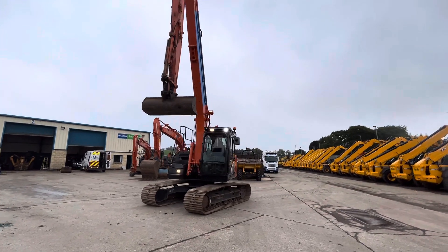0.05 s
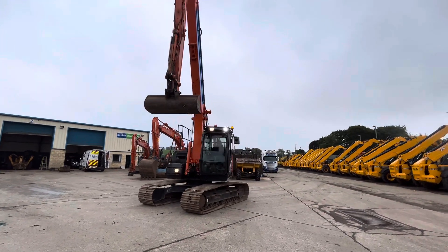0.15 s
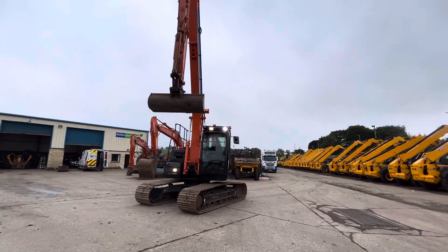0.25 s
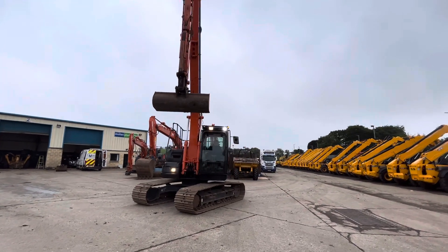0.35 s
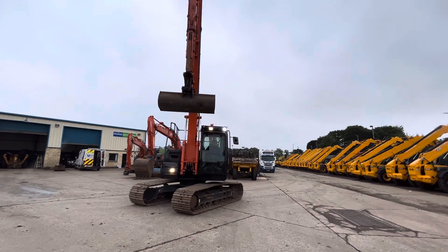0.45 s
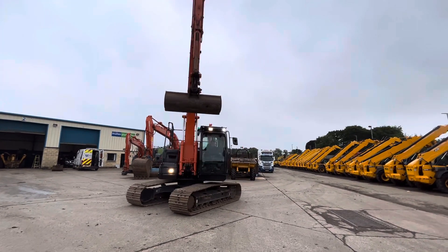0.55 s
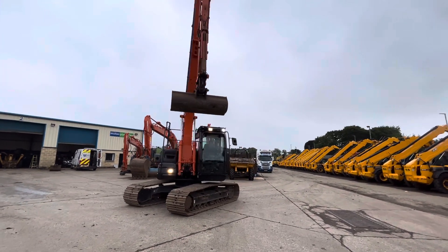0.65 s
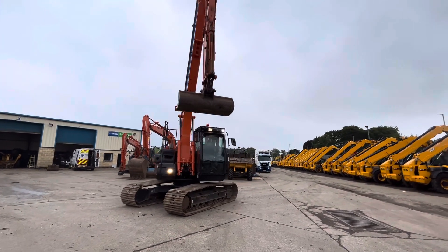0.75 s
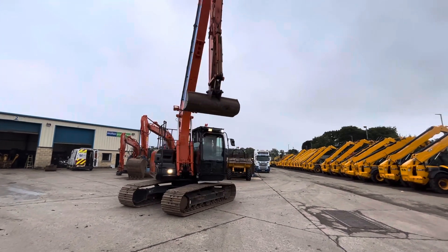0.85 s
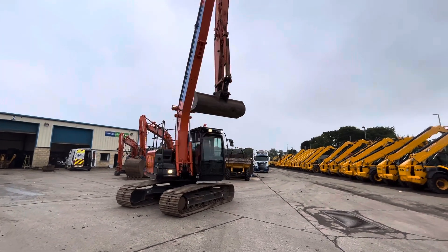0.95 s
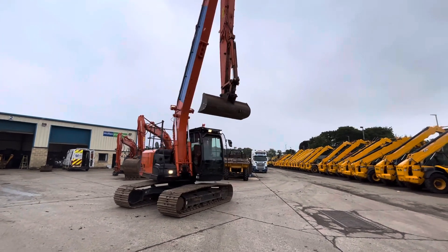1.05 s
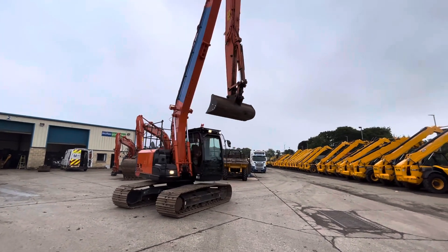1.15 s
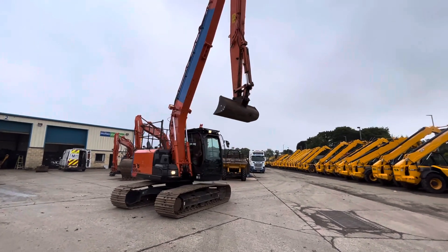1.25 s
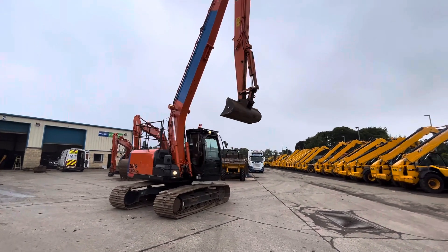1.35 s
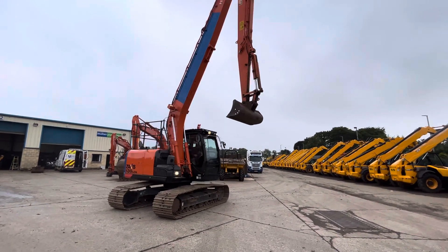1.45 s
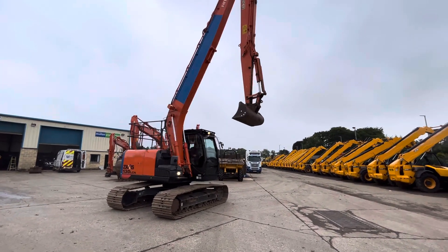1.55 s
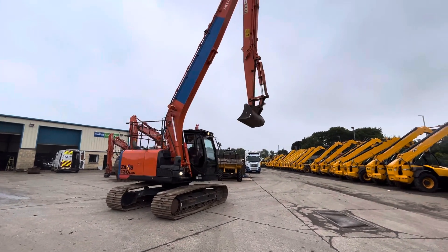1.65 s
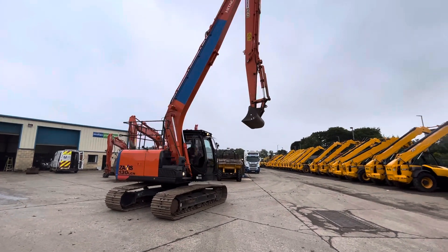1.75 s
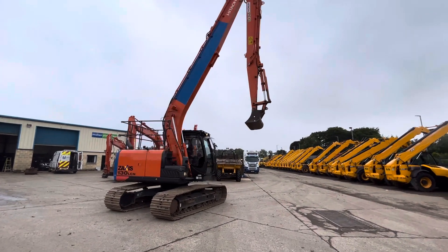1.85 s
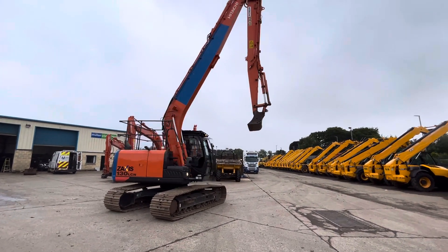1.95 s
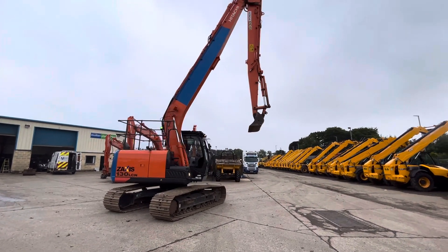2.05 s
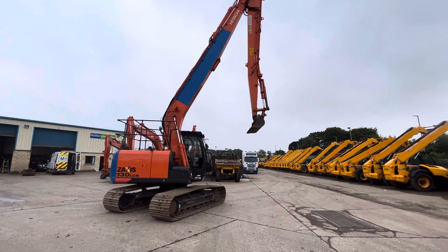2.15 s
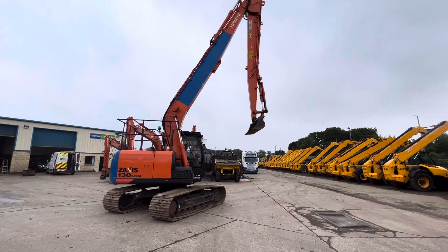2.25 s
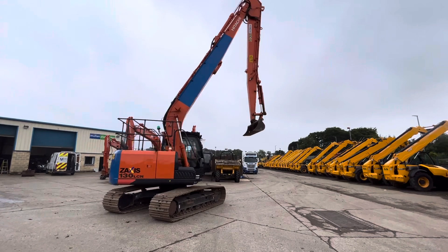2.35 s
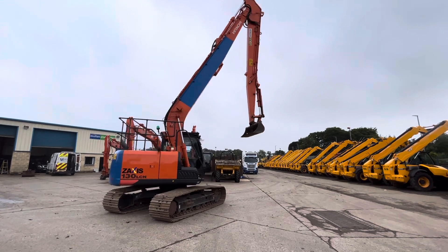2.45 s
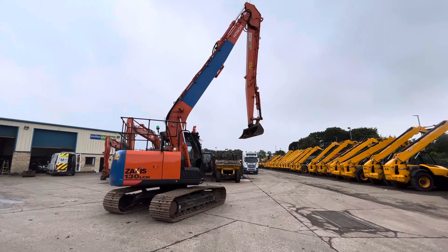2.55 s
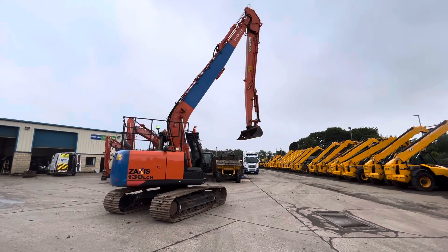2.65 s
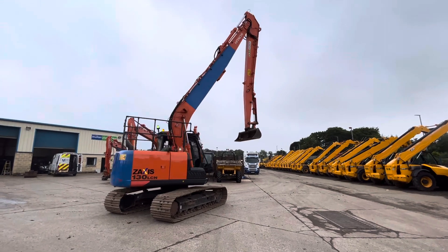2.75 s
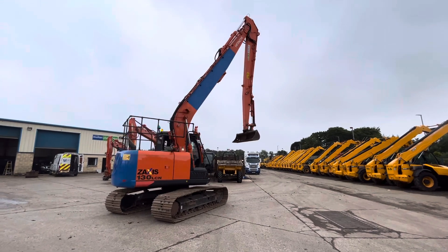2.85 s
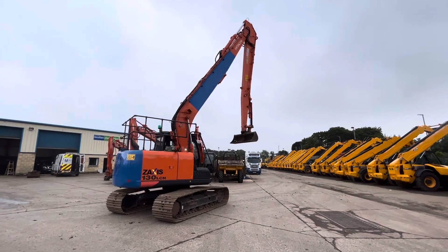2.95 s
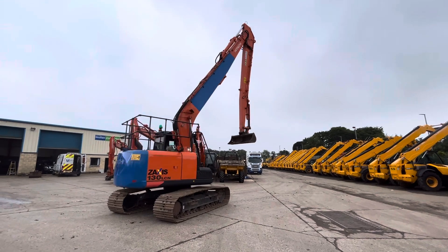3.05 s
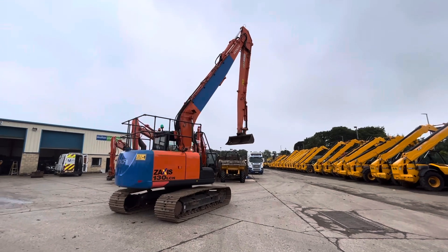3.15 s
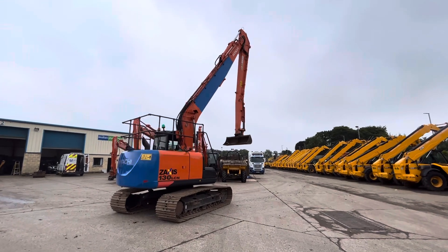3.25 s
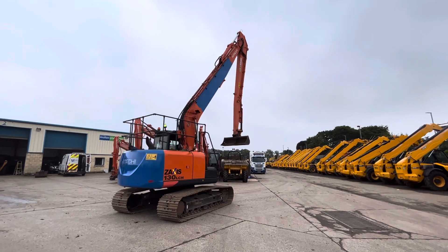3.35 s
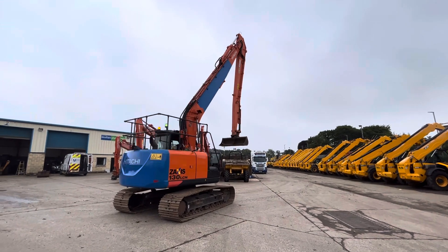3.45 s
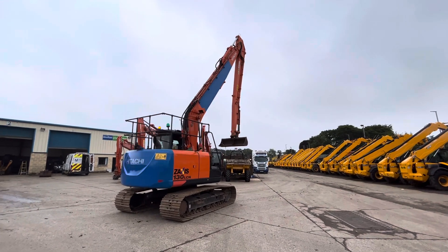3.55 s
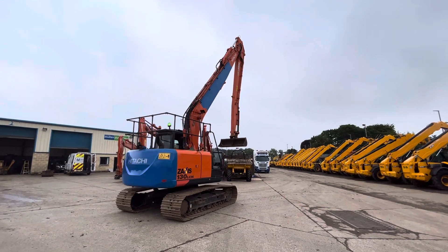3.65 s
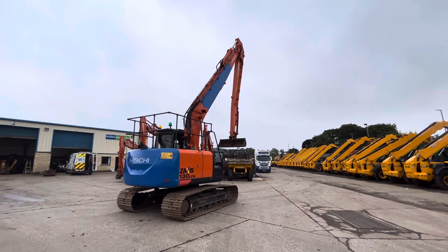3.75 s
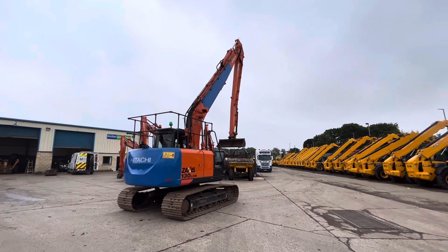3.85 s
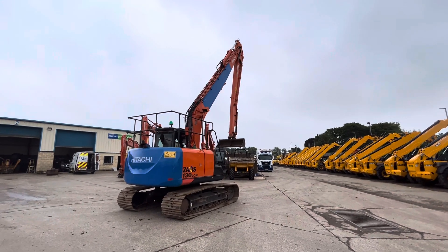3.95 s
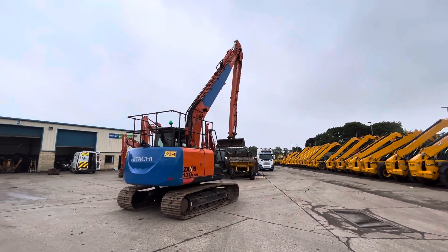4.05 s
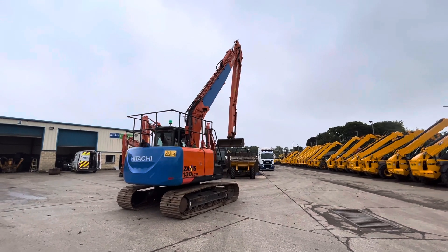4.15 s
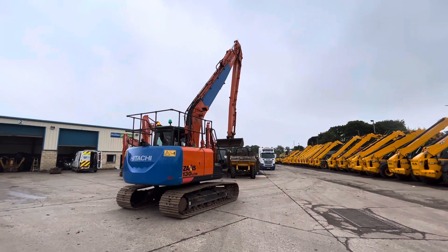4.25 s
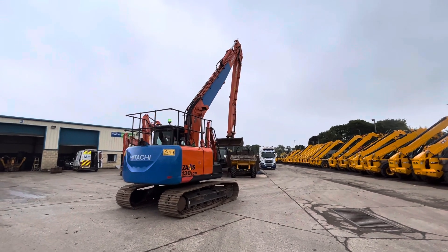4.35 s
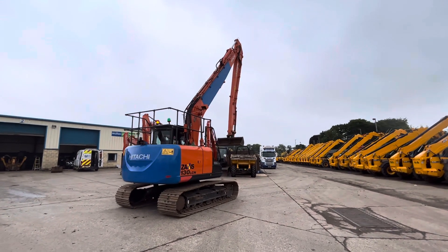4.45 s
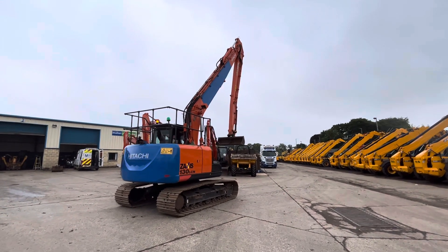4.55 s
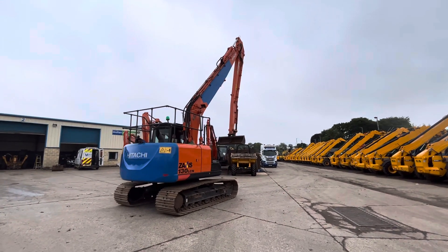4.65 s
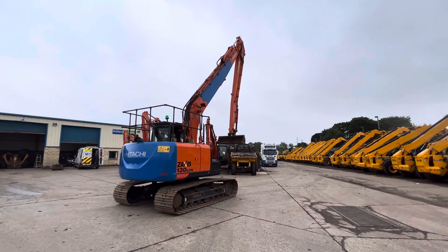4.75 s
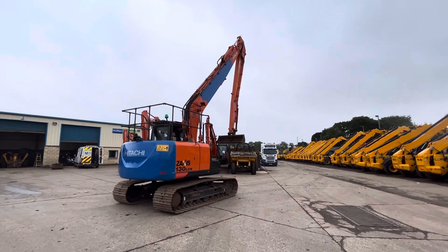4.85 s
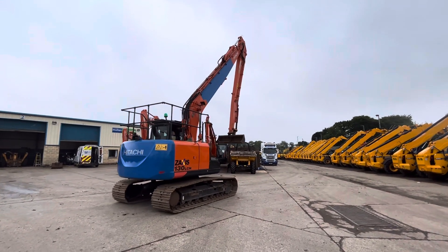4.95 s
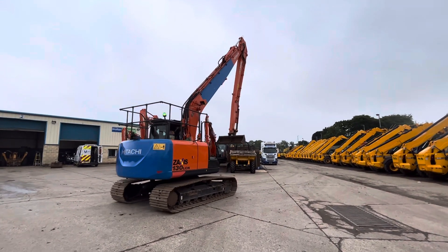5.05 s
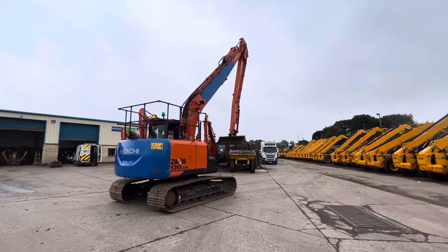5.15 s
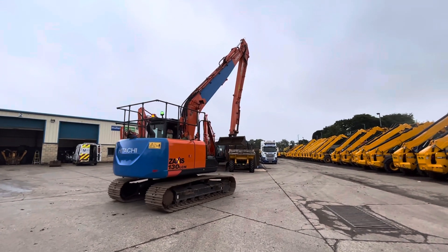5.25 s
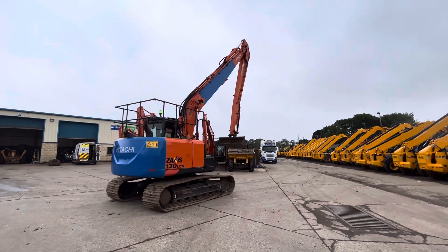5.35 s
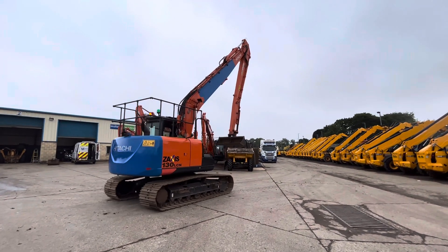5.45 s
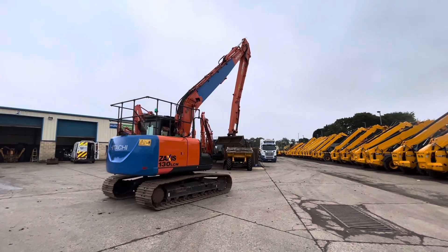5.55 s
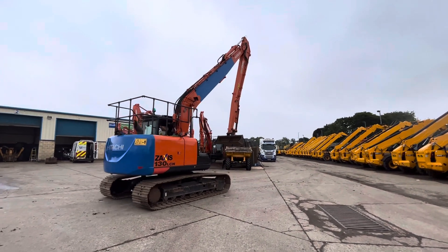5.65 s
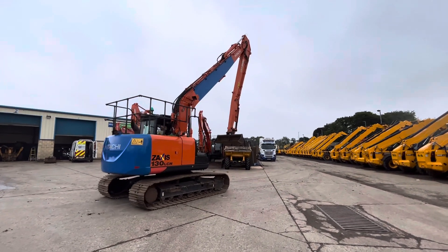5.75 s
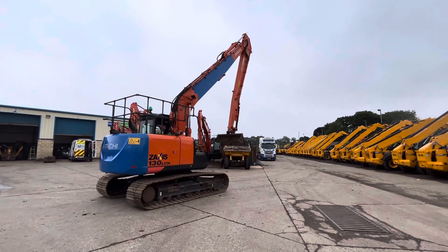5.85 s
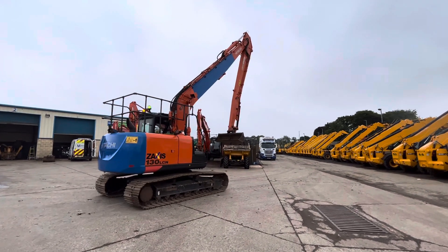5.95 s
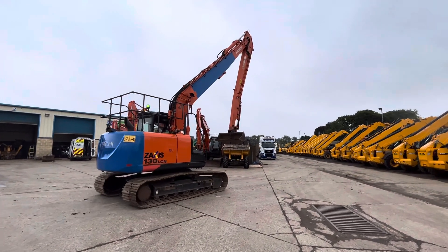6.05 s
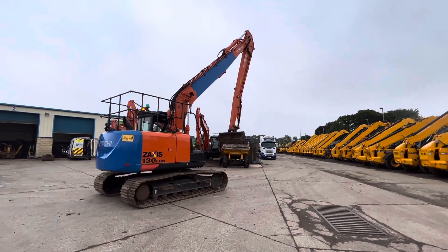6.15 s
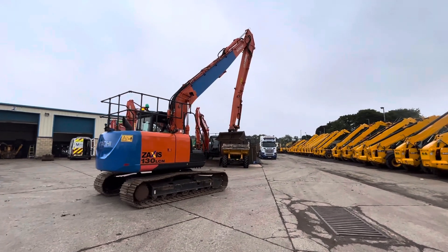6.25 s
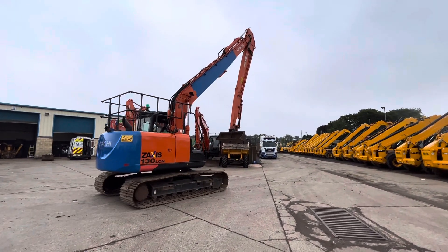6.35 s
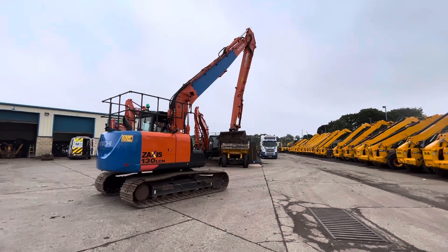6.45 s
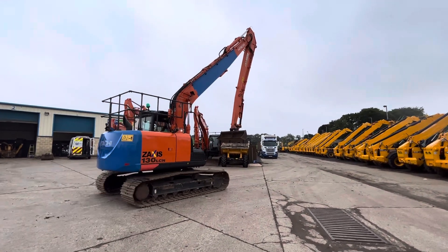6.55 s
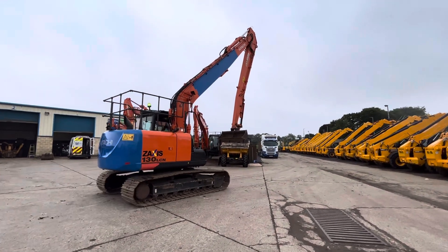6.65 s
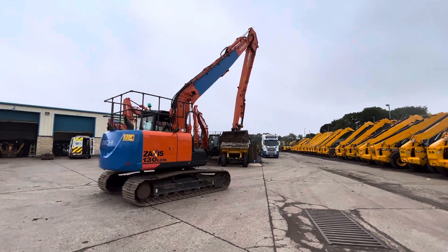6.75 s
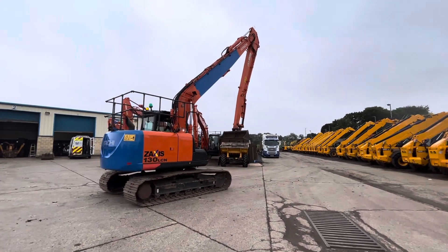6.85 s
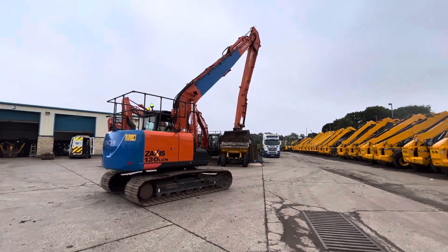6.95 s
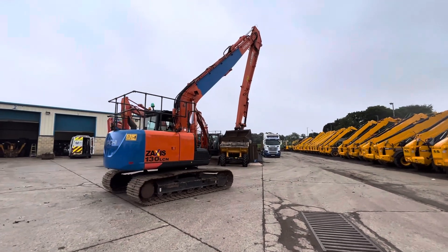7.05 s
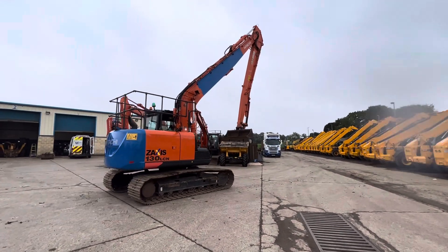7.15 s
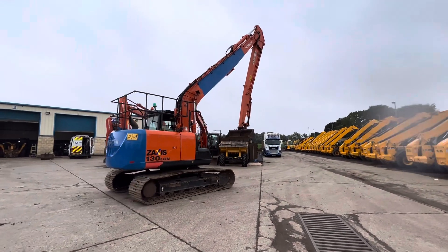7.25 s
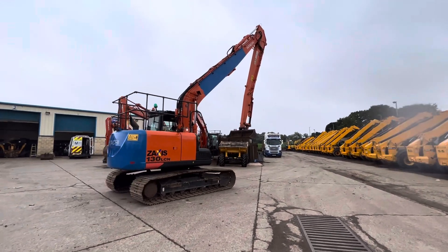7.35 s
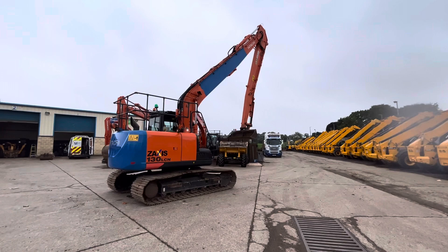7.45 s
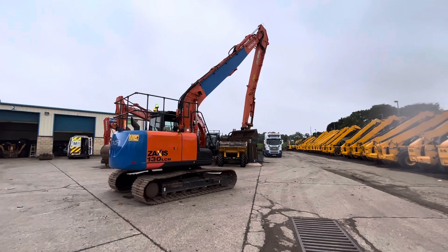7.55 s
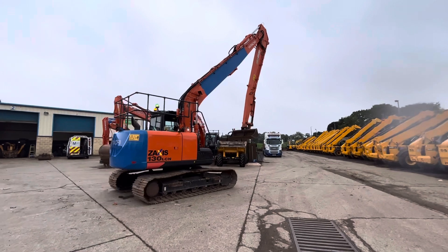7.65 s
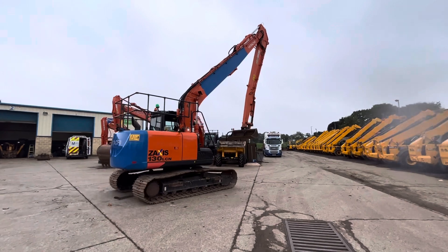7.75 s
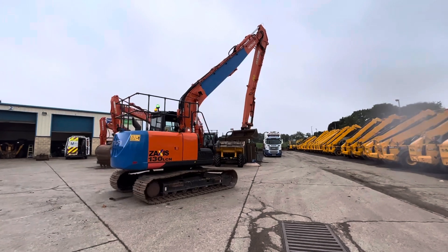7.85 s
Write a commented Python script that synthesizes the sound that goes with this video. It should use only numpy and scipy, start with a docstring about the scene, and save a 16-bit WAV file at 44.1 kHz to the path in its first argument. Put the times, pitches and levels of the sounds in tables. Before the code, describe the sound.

A diesel excavator in an open concrete yard, heard in stereo with short echoes from ground and sheds. From 0 s a quiet, low throbbing idle near 60 Hz with a soft hum; gritty knocks and grinds at about 0.2, 0.6 and 1.1 s as the upper body swings. The engine, rumble and valve hiss swell until about 4 s, with a low judder at 3.3 s, low wind buffets from then on, and a rising motor whine near 4 s. Between 4 and 4.7 s the engine revs up slightly and the pump note rises. From 4.3 to 6.5 s, short dry squeals, mostly around 1.4 and 3.3 kHz, overlap with crackling grit scrapes, densest near 5 s. Track slaps begin sparsely at 4.8 s, strengthen after 6 s, and from 6.9 s to the end at about 7.9 s become loud, irregular, rapid steel clanks with thuds, dominating the engine.

```python
"""Out of doors in a light breeze, a diesel excavator idles with a throbbing exhaust: sines locked to its firing.
Knocks and grinding come first as it swings its engine end towards the microphone and the machine grows louder.
It then crawls closer and revs up: filtered random blows make the rumble and clatter, and the pump note rises.
Dry pins squeal (sliding tones), grit scrapes (bursts of cracks) and track shoes slap (blows ringing steel modes).
Echoes from the yard surround it throughout, and gusts of filtered noise buffet the two microphone ports."""
import sys
import numpy as np
from scipy import signal
from scipy.fft import rfft, irfft, next_fast_len
from scipy.io import wavfile
from scipy.ndimage import map_coordinates

SR = 44100
rng = np.random.default_rng(int(sys.argv[2]) if len(sys.argv) > 2 else 0)


def waveform_to_disk(signal):
    """Save audio, clipped to [-1, 1], as 16-bit WAV at the path in sys.argv[1]."""
    frames = np.transpose(np.atleast_2d(signal))
    scaled = np.clip(frames, -1, 1) * 32767
    samples = np.round(scaled).astype(np.int16)
    wavfile.write(sys.argv[1], SR, samples)


N = 348831
T = np.arange(N) / SR

# low spectrum of the shaken frame: (f/Hz, relative level per Hz/dB)
RUMBLE_COLOUR = [(35, -36), (70, -11), (110, -3.5), (170, 1.5), (210, -0.5), (300, -1), (370, -10),
                 (480, -29), (900, -81)]
# ringing modes of a steel track shoe: (f/Hz, decay by 60 dB/s, level/dB)
SHOE_MODES = [(502, 0.064, -6), (632, 0.055, 1), (728, 0.029, 4.5), (850, 0.029, 7), (950, 0.017, -34),
              (1110, .04, -47), (1330, 0.06, -1), (1396, 0.047, 6.5), (1590, 0.06, -24), (1678, 0.032, -3),
              (2160, 0.041, -7), (3020, 0.064, -8), (4710, .04, -20)]


def undb(db):
    """Decibels to gain."""
    return 10 ** (np.asarray(db) / 20)


def unit(x):
    """Scale to rms 1."""
    return x / np.sqrt(np.mean(x ** 2) + 1e-20)


def on_log_axis(points, hz):
    """Read (f/Hz, value) points on a log-frequency axis."""
    f, value = np.transpose(points)
    return np.interp(np.log(hz + 1), np.log(f + 1), value)


def colour(x, points):
    """Filter a sound by (f/Hz, level/dB) points and scale it to rms 1."""
    size = next_fast_len(x.shape[-1])
    gain = undb(on_log_axis(points, np.fft.rfftfreq(size, 1 / SR)))
    return unit(irfft(rfft(x, size) * gain, size)[..., :x.shape[-1]])


def shelf(x, hz, db):
    """Lift or lower the treble above a corner."""
    treble = signal.sosfilt(signal.butter(1, min(hz, SR / 3), "high", fs=SR, output="sos"), x)
    return x + (undb(db) - 1) * treble


def walk(rate, size=N):
    """Smooth random curve through `rate` chance values a second."""
    place = np.arange(size) * rate / SR
    return map_coordinates(rng.standard_normal(int(place[-1]) + 3), [place], order=2, mode="nearest")


def impacts(size, rate, spread_db):
    """Tiny blows of uneven strength, on average `rate` a second, at rms 1."""
    hits = rng.random(size) < rate / SR
    signs = rng.choice([-1, 1], size)
    return unit(hits * signs * undb(spread_db * rng.standard_normal(size)))


def add(track, start, x):
    """Mix a sound in at a time in seconds."""
    i = max(int(start * SR), 0)
    track[i:i + len(x)] += x[:max(N - i, 0)]


def burst(length, rise, fall):
    """Envelope that rises linearly and dies away exponentially once `length` seconds have passed."""
    t = np.arange(int((length + 6 * fall) * SR)) / SR
    return np.minimum(t / rise, 1) * np.exp(-np.maximum(t - length, 0) / fall)


def modes(rows, size, detune):
    """Impulse response of decaying sines, each mode detuned by a random share."""
    t = T[:size]
    response = np.zeros(len(t))
    for hz, t60, db in rows:
        decay = rng.choice([-1, 1]) * undb(db) * np.exp(-np.log(1000) * t / t60)
        response += decay * np.sin(2 * np.pi * hz * (1 + detune * rng.standard_normal()) * t)
    return response


def ring_link(force):
    """Strike the modes of one track link with a force, at rms 1."""
    # ringing modes of a track link: (f/Hz, decay by 60 dB/s, level/dB)
    link_modes = [(3213, 0.044, 6), (3450, 0.031, 2.5), (4252, 0.038, 3), (4725, .025, 4.5),
                  (5270, 0.053, -2.5), (6056, .06, -3), (6270, 0.085, -6), (6690, 0.041, 1.5),
                  (7280, 0.033, -1), (7790, 0.041, 2), (9350, 0.027, -5), (10440, 0.03, -7),
                  (11390, 0.034, -4), (12530, 0.024, -1)]
    response = modes(link_modes, len(force), detune=0.0096)
    return unit(signal.fftconvolve(force, response)[:len(force)])


def ramp(start, end):
    """Progress of a move, from 0 at its start to 1 at its end, in seconds."""
    return np.interp(T, [start, end], [0, 1])


def travel_progress():
    """The tracks gather speed and bring the machine closer."""
    return ramp(2.58, 7.32)


def loudness(rest, swing, travel):
    """Level in dB of a part: at rest, plus its changes as the machine swings round and drives closer."""
    # the body hides the engine early on, so the swing's gain comes slightly late
    return rest + swing * ramp(0.59, 4.4) ** 1.13 + travel * travel_progress()


def surge():
    """Slow wavering in dB that grows as the tracks gather speed."""
    return 2.5 * np.sqrt(travel_progress()) * walk(7.2)


def wind():
    """Gusts swell over a light breeze; each microphone port gets its own noise from the eddies."""
    # gusts on the microphone: (t/s, length/s, level/dB)
    gust_rows = [(0, 0.57, -55), (3.298, 0.16, -31), (3.8, 1.3, -33.5), (5.842, 1.02, -29),
                 (7.35, 0.58, -31.5)]
    # spectrum of the buffeting: (f/Hz, relative level per Hz/dB)
    buffet_colour = [(25, -26), (45, -9), (65, 5.5), (100, -6), (160, -4.5), (250, -12), (400, -18.5),
                     (900, -53)]
    strength = np.full(N, undb(-54))  # the breeze
    for start, length, db in gust_rows:
        add(strength, start, burst(length, rise=0.086, fall=0.13) * undb(db))
    return colour(rng.standard_normal((2, N)), buffet_colour) * strength * undb(2 * walk(10))


def links(count=7):
    """Slack links knock lightly and keep the shoes' steel modes ringing between slaps."""
    knocks = np.zeros(N)
    for _ in range(count):
        shoe = modes(SHOE_MODES, SR // 4, detune=0.039)
        knocks += signal.fftconvolve(impacts(N, 15, 2.8), shoe)[:N]
    return unit(shelf(knocks, 1100, 12.0)) * undb(loudness(rest=-69, swing=12.5, travel=14.5))


def rubs(rows, spectrum):
    """Short gritty bursts of random blows where heavy parts rub."""
    out = np.zeros(N)
    for start, length, db in rows:
        press = burst(length, rise=0.0022, fall=0.013)
        grains = colour(impacts(len(press), 1500, 6.9), spectrum)
        add(out, start, grains * press * undb(db))
    return out


def swing_grinds():
    """The upper body knocks and grinds in gritty bursts as heavy parts rub."""
    # knocks and grinds: (t/s, length/s, level/dB)
    grind_rows = [(0, .35, -57), (.174, .008, -45.5), (.199, .007, -46.5), (.587, .004, -51),
                  (.636, 0.024, -43.5), (.668, .012, -42), (1.12, .015, -46.5), (1.143, 0.013, -46)]
    # spectrum of the grinding: (f/Hz, relative level per Hz/dB)
    grind_colour = [(250, 6), (800, 3), (1700, 3), (2200, 5), (2800, -8), (4500, -15), (9000, -17.5),
                    (14000, -32)]
    return rubs(grind_rows, grind_colour)


def judders():
    """The frame judders in short low bursts of blows."""
    # judders: (t/s, length/s, level/dB)
    judder_rows = [(3.27, 0.2, -34.5), (6.73, 0.063, -23.5), (6.86, 0.062, -23)]
    return rubs(judder_rows, RUMBLE_COLOUR)


def hums():
    """Swing drive and travel motors whine and the frame drones: gliding sines, shaken by roughness."""
    # hums: (t/s, length/s, start f/Hz, end f/Hz, level/dB, roughness)
    hum_rows = [(0, 1.5, 141.3, 141, -46.5, 0.21), (1.3, 1.25, 142.5, 141.8, -41, 0.34),
                (2.4, 0.62, 129.7, 115.3, -39.5, 0.44), (3.87, 0.86, 833, 894, -43, 0.33),
                (3.848, 0.66, 1903, 2045, -53.5, 0.32), (4.27, 0.41, 2010, 2107, -46, 0.4),
                (4.6, .27, 259.3, 250.3, -37, 0.31), (5.151, 0.816, 253.4, 251.5, -32.5, 0.24),
                (5.972, 0.35, 243.6, 261.6, -37, 0.27)]
    out = np.zeros(N)
    for start, length, hz0, hz1, db, rough in hum_rows:
        size = int(length * SR)
        hz = np.linspace(hz0, hz1, size) + rough * 14 * walk(41.0, size)
        swell = signal.windows.tukey(size, .25) * undb(db + rough * 7.9 * walk(23.4, size))
        add(out, start, np.sqrt(2) * swell * np.sin(2 * np.pi * np.cumsum(hz) / SR))
    return out


def pump(phase):
    """The hydraulic pump's pistons sing at six times the firing rate, so the note rises with the engine."""
    # level of the whine: (t/s, level/dB)
    pump_level = [(0, -59.5), (.6, -52), (1.2, -53.5), (2.2, -56.5), (2.7, -48), (3.5, -41.5), (4.5, -45),
                  (5.2, -50), (7.9, -43)]
    level_db = np.interp(T, *np.transpose(pump_level)) + 1.5 * walk(14)
    return np.sqrt(2) * np.sin(6 * phase + 0.6 * walk(16)) * undb(level_db)


def running_gear(phase):
    """Rollers shake the frame, machinery clatters in time with the firing, and oil hisses in the valves."""
    # spectra of clatter, valve hiss and the finest oil sizzle: (f/Hz, relative level per Hz/dB)
    clatter_colour = [(200, 1.5), (400, -8.5), (560, 0), (820, 5.5), (1100, -7.5), (1450, -4), (1800, -8),
                      (2400, -18), (4000, -18), (8000, -64)]
    hiss_colour = [(700, 7.5), (1300, 9), (2100, 4.5), (2700, 6), (4300, 2.5), (5600, 0), (7500, -9),
                   (9300, -3.5), (11500, -17), (13500, -41), (15000, -38)]
    sizzle_colour = [(7800, -30), (9200, -5), (11000, 2.5), (13500, -5.5), (15000, -30)]

    rumble_db = loudness(rest=-45.5, swing=9.5, travel=7.5) + 0.89 * surge()
    rumble = colour(impacts(N, 900, 5.46), RUMBLE_COLOUR) * undb(rumble_db)

    rattle = impacts(N, 7000, 3.9) * (1 + 0.054 * np.cos(phase))
    clatter_db = loudness(rest=-52, swing=8.5, travel=15) + 2.22 * walk(14)
    clatter = colour(rattle, clatter_colour) * undb(clatter_db)

    hiss_db = loudness(rest=-60, swing=14.5, travel=2.5) + 0.57 * walk(20)
    hiss = colour(rng.standard_normal(N), hiss_colour) * undb(hiss_db)

    sizzle_db = loudness(rest=-74.5, swing=22.5, travel=-11.5)
    sizzle = colour(rng.standard_normal(N), sizzle_colour) * undb(sizzle_db)
    return rumble + clatter + hiss + sizzle


def engine():
    """Almost even firing drives wavering sines, the exhaust note; returns it and the firing phase."""
    # firing rate, sagging under load and then revving up: (t/s, f/Hz)
    firing_rate = [(0, 60.48), (2.4, 60.25), (3.1, 60.32), (3.78, 60.1), (4.1, 62.45), (4.72, 66.59),
                   (7.9, 66.38)]
    # exhaust lines: (multiple of the firing rate, level/dB)
    exhaust_lines = [(1, 2.5), (1.5, -10.5), (2, -7.5), (3, -19), (4, -17.5), (5, -35), (9, -27.5),
                     (12, -22), (13, -27)]
    hz = np.interp(T, *np.transpose(firing_rate))
    phase = 2 * np.pi * np.cumsum(hz * (1 + .002 * walk(14))) / SR
    note = undb(exhaust_lines[0][1] + 1.0 * walk(25)) * np.sin(phase)
    for k, db in exhaust_lines[1:]:
        note += undb(db + 2.0 * walk(5.7)) * np.sin(k * phase + 2 * np.pi * rng.random())
    level_db = loudness(rest=-40.5, swing=10.5, travel=-5) + surge()
    return np.sqrt(2) * note * undb(level_db), phase


def scrapes():
    """Grit cracks in jerky bursts between steel and concrete and sets the link ringing."""
    # grit crushed under the shoes: (t/s, length/s, level/dB, treble shelf/dB)
    scrape_rows = [(4.59, 0.024, -37.5, 21), (4.683, 0.07, -42, 2), (4.966, 0.095, -32, -24),
                   (5.123, 0.015, -29, 12), (5.226, 0.055, -34.5, 18), (5.365, 0.076, -28, 22),
                   (5.473, 0.041, -21, -10), (5.562, 0.087, -31, -10), (5.799, .015, -41, 9),
                   (6.092, 0.013, -24, -25), (6.205, 0.046, -33.5, 23), (6.378, 0.0078, -35.5, 18),
                   (6.873, .007, -37, 10), (7.263, 0.021, -42, 26), (7.397, .005, -43, 10),
                   (7.768, 0.014, -33, 22), (7.785, 0.048, -43, 10)]
    # spectrum of the grit: (f/Hz, relative level per Hz/dB)
    grit_colour = [(300, 11), (800, -1), (1700, 8.5), (2600, 7), (4500, 0), (7500, 0.5), (10000, 5),
                   (12500, 4), (15000, -21)]
    ring_share = 0.52  # share of metallic ring in the power
    out = np.zeros(N)
    for start, length, db, treble_db in scrape_rows:
        press = burst(length, rise=0.43 * length, fall=0.01)
        size = len(press)
        cracks = unit(impacts(size, 2200, 6) * undb(walk(130, size)))
        grains = np.sqrt(1 - ring_share) * cracks + np.sqrt(ring_share) * ring_link(cracks)
        scrape = unit(shelf(colour(grains, grit_colour), 4300, treble_db))
        add(out, start, scrape * press * undb(db))
    return out


def squeal(length, pitch, end_hz, rough, rise):
    """A dry pin sticks and slips at a link resonance; uneven grip shakes the pitch and lifts overtones."""
    # overtones: (multiple of the pitch, level/dB before roughness is added)
    overtone_rows = [(2, -1), (3, -8.5), (4, -19)]
    grip = burst(length * 0.95, rise, fall=0.007)
    size = len(grip)
    hz = np.interp(T[:size], [0, length], [pitch, end_hz])
    hz = hz + rough * (35 * walk(75.7, size) + 1.11 * np.sqrt(pitch) * walk(715, size))
    phase = 2 * np.pi * np.cumsum(hz) / SR
    tone = np.sin(phase)
    overtone_db = -28 + 25.5 * rough
    for k, db in overtone_rows:
        if k * pitch < 13000:
            tone = tone + undb(overtone_db + db + 4.2 * walk(49.0, size)) * np.sin(k * phase)
    shake = 1 + 0.72 * rough * walk(168.6, size)
    flutter = undb(1.27 * walk(43.7, size))
    return unit(tone * shake * flutter) * grip


def squeals():
    """Dry pins squeal; the rougher the grip, the more its ragged slips ring the link's other modes."""
    # squeals sliding as the load shifts: (t/s, length/s, start f/Hz, end f/Hz, level/dB, roughness, swell/s)
    squeal_rows = [(1.158, 0.023, 3330, 3280, -66, .5, .008), (4.331, 0.063, 1463, 1373, -28, 0.57, 0.043),
                   (4.587, 0.087, 7255, 7215, -21.5, 0.18, 0.03),
                   (4.601, 0.087, 1490, 1383, -30, 0.35, 0.015),
                   (4.661, 0.085, 1402, 1414, -17, 0.22, 0.023),
                   (4.694, 0.058, 2360, 2324, -25.5, 0.6, 0.02),
                   (4.686, 0.077, 4625, 4720, -37.5, 0.88, 0.018),
                   (4.699, 0.073, 7240, 7130, -33, 0.2, 0.013),
                   (4.757, 0.093, 3470, 3440, -25.5, 0.11, 0.015),
                   (4.824, .135, 3448, 3432, -20.5, 0.24, 0.013), (4.84, 0.088, 3185, 3100, -37, 0.3, .02),
                   (4.95, 0.06, 1523, 1575, -17.5, 0.42, 0.015),
                   (4.96, 0.043, 3380, 3287, -18.5, 0.5, 0.019),
                   (5.022, 0.04, 3312, 3280, -15.5, 0.55, 0.0063),
                   (5.028, 0.092, 1455, 1414, -13.5, 0.33, 0.022),
                   (5.032, 0.021, 6590, 6610, -20, 0.37, 0.0078),
                   (5.065, 0.042, 6000, 6090, -30, 0.18, .03), (5.116, 0.017, 4080, 4025, -13, 0.32, 0.01),
                   (5.04, 0.047, 4790, 4790, -28.5, 0.46, .01), (5.148, 0.021, 5480, 5450, -34, 0.5, 0.009),
                   (5.227, 0.073, 6200, 6300, -41, 0.6, .015),
                   (5.238, 0.015, 7710, 7810, -25, 0.42, 0.0093),
                   (5.119, 0.13, 1441, 1390, -24, 0.36, .006), (5.216, 0.076, 1400, 1423, -15, 0.15, 0.057),
                   (5.217, .11, 3092, 3154, -27, 0.58, 0.016), (5.246, 0.037, 1563, 1606, -23, 0.76, 0.01),
                   (5.3, 0.026, 1450, 1497, -23.5, 0.26, 0.0068),
                   (5.317, 0.028, 4200, 4295, -24.5, 0.52, 0.022),
                   (5.376, .045, 11900, 12200, -36, 0.9, 0.01),
                   (5.489, 0.022, 3480, 3430, -25.5, 0.9, .008), (5.503, 0.062, 4250, 4060, -25, .4, 0.017),
                   (5.567, 0.025, 1423, 1395, -15, 0.5, 0.0087),
                   (5.601, 0.028, 1380, 1380, -16.5, 0.23, .012),
                   (5.569, 0.039, 3185, 3183, -18.5, 0.49, 0.007),
                   (5.614, 0.066, 3214, 3237, -18.5, 0.42, 0.0068),
                   (5.69, 0.094, 3278, 3237, -26, 0.48, 0.0053),
                   (5.75, 0.047, 4296, 4320, -28, 0.17, 0.022), (5.871, 0.019, 6300, 6320, -39, .4, .008),
                   (5.885, 0.044, 3520, 3460, -27, 0.44, .0043),
                   (5.941, .115, 3337, 3267, -32.5, 0.26, 0.032),
                   (5.918, 0.063, 1463, 1546, -21.5, 0.4, 0.011),
                   (6.004, 0.045, 1420, 1605, -25.5, 0.62, 0.01),
                   (6.056, 0.14, 3486, 3350, -33.5, 0.68, 0.012),
                   (6.064, 0.16, 11540, 11630, -37, 0.4, 0.0074),
                   (6.181, 0.046, 12150, 12400, -38, 0.3, .01),
                   (6.232, 0.025, 2410, 2275, -26.5, 1.2, 0.013),
                   (6.374, 0.018, 2330, 2250, -25, 1.12, 0.011),
                   (6.557, 0.03, 3300, 3200, -35, 0.65, 0.011)]
    out = np.zeros(N)
    for start, length, hz0, hz1, db, rough, rise in squeal_rows:
        tone = squeal(length, hz0, hz1, rough, rise)
        slips = tone * impacts(len(tone), 350, 3)
        rasp = shelf(ring_link(slips), 8000, -13)
        rasp_gain = np.std(tone) * rough * undb(-11)
        add(out, start, (tone + rasp * rasp_gain) * undb(db))
    return out


def slaps():
    """Shoes land with a blow and rattle that ring their steel and thump the frame; harder is brighter."""
    # shoes touching down, slapping flat and bouncing: (t/s, swell/s, rattle length/s, level/dB)
    slap_rows = [(4.833, .0094, 0.082, -32), (5.145, 0.0074, 0.02, -33), (5.397, .006, 0.013, -29),
                 (5.653, 0.0085, 0.02, -29), (5.885, 0.0051, .03, -35), (6.095, 0.0082, 0.014, -24),
                 (6.243, 0.0063, 0.031, -22.5), (6.436, .006, 0.021, -21), (6.58, 0.0057, 0.011, -20),
                 (6.603, 0.0059, .02, -24.5), (6.707, .01, 0.021, -23), (6.733, .008, 0.028, -21),
                 (6.862, .005, 0.0098, -20.5), (6.877, .004, 0.013, -15), (6.93, .003, 0.0053, -30),
                 (7.001, 0.0029, 0.012, -20.5), (7.013, 0.0047, 0.0082, -14), (7.072, .006, .015, -32),
                 (7.123, 0.014, 0.019, -17.5), (7.146, .002, 0.0042, -20), (7.164, .003, .008, -22),
                 (7.21, 0.0059, 0.014, -21), (7.256, 0.0066, 0.022, -17.5), (7.391, .008, .014, -15),
                 (7.441, 0.0029, 0.0054, -26.5), (7.51, 0.0049, 0.018, -17.5), (7.534, .006, 0.0098, -19.5),
                 (7.62, .004, 0.019, -19), (7.645, 0.0042, 0.014, -18), (7.666, 0.0029, 0.017, -20),
                 (7.745, 0.0038, 0.022, -16), (7.77, 0.0039, 0.017, -18), (7.812, 0.0041, 0.011, -25.5),
                 (7.867, .02, 0.026, -19), (7.902, .003, 0.0089, -15.5)]
    # spectrum of the cracking grit and steel: (f/Hz, relative level per Hz/dB)
    crack_colour = [(300, -12), (800, -2.5), (1600, 8.5), (2200, 0.5), (4500, -7.5), (6500, -18.5),
                    (9000, -30), (12000, -28), (15000, -64)]
    out = np.zeros(N)
    for start, rise, length, db in slap_rows:
        force = burst(length, rise, fall=0.0105)
        size = len(force)
        blows = impacts(size, 850, 1.7) * force
        blows[int(rise * SR)] += undb(22.5)  # the shoe comes down flat
        crunch = impacts(size, 3500, 6.3) * force * undb(2 * walk(206, size))  # grit under the shoe
        steel = unit(signal.fftconvolve(blows, modes(SHOE_MODES, size, detune=0.033))[:size])
        crack = colour(crunch + undb(-9.0) * blows, crack_colour)
        treble_db = -2 + 0.75 * (db + 16)  # brighter above a firm slap at -16 dB, duller below
        clank = shelf(undb(0.04) * steel + undb(-4.0) * crack, 1560, treble_db)
        thud = undb(-7.5) * colour(blows, RUMBLE_COLOUR)
        add(out, start, (clank + thud) * np.sqrt(np.mean(force ** 2)) * undb(db))
    return out


def yard(x, echo_db, t60):
    """Scattered echoes from ground and sheds: a decaying noise tail, different at each port."""
    t = T[:SR // 2]
    tail = rng.standard_normal((2, len(t))) * np.exp(-np.log(1000) * t / t60) * (t > .004)
    tail /= np.sqrt(np.sum(tail ** 2, axis=1, keepdims=True))
    return undb(echo_db) * signal.fftconvolve(x[None], tail, axes=1)[:, :N]


def ports(x):
    """Direct sound meets the two ports with a phase and level difference that varies with frequency."""
    # level difference: (f/Hz, left minus right/dB)
    port_balance = [(60, -1.5), (700, -1), (1450, 0.2), (2300, -9.5), (3300, 13.5), (4500, 8.5),
                    (6500, 16.5), (7250, -7.5), (9500, -8.5), (12000, 0.5)]
    # phase difference: (f/Hz, lead of the left port/rad)
    port_phase = [(0, -0.5), (700, 1.38), (1450, 1.2), (2500, 4), (3400, 3.5), (4500, 5), (6600, 7),
                  (8200, 10), (10500, 14.5), (11500, 0), (14000, 18.5)]
    size = next_fast_len(N)
    hz = np.fft.rfftfreq(size, 1 / SR)
    side = np.array([[1], [-1]]) / 2  # each port takes half of the difference
    gain = undb(side * on_log_axis(port_balance, hz))
    gain /= np.sqrt(np.mean(gain ** 2, axis=0))
    lead = np.interp(hz, *np.transpose(port_phase))
    return irfft(rfft(x, size) * gain * np.exp(1j * side * lead), size)[:, :N]


def scene():
    """Wind, machine and tracks, with direct sound and echoes at both ports."""
    exhaust, phase = engine()
    machine = running_gear(phase) + pump(phase) + hums() + links() + judders()
    pins = squeals()
    tracks = slaps() + scrapes() + swing_grinds()
    direct = ports(exhaust + machine + pins + tracks)
    # long waves reach both ports alike, so mainly the machine's shorter ones feed the differing echoes
    echoes = yard(shelf(machine, 470, 9.4), -15.5, 0.53)
    echoes = echoes + yard(pins, -8.5, 0.37) + yard(tracks, -7.5, 0.29)
    return direct + echoes + wind()


def record(dry):
    """The recorder cuts the deep bass below 42 Hz and the top above 14.7 kHz."""
    dry = signal.sosfilt(signal.butter(3, 42, "high", fs=SR, output="sos"), dry)
    return signal.sosfilt(signal.ellip(8, .2, 70, 14700, fs=SR, output="sos"), dry)


dry = scene()
out = record(dry)
waveform_to_disk(out)
```